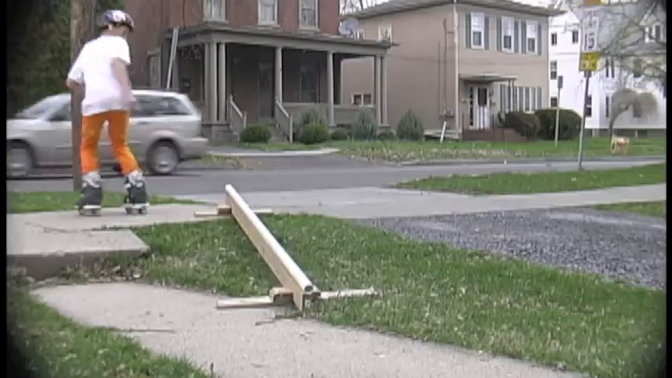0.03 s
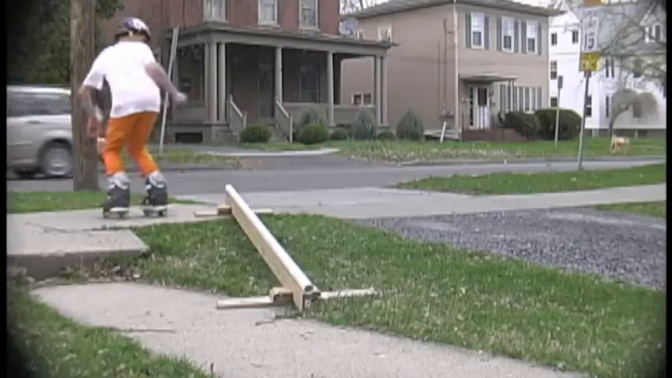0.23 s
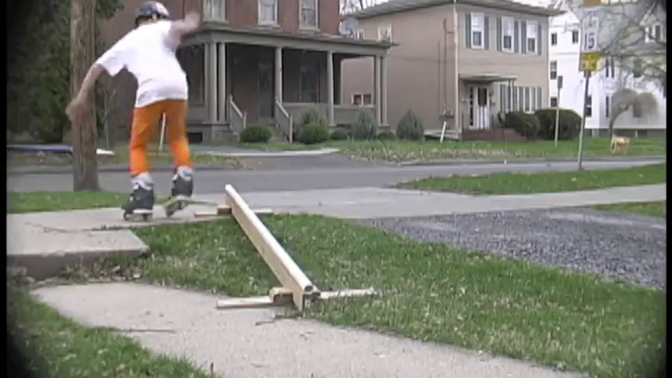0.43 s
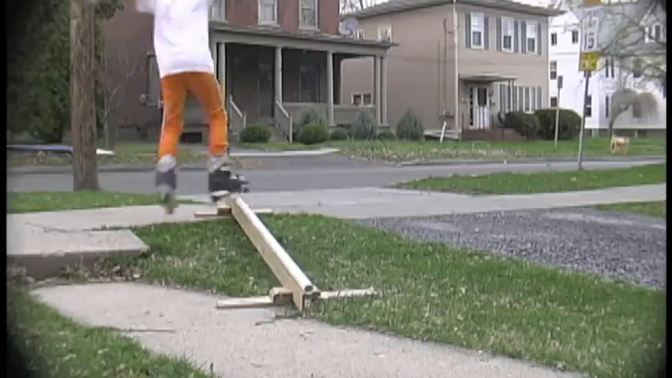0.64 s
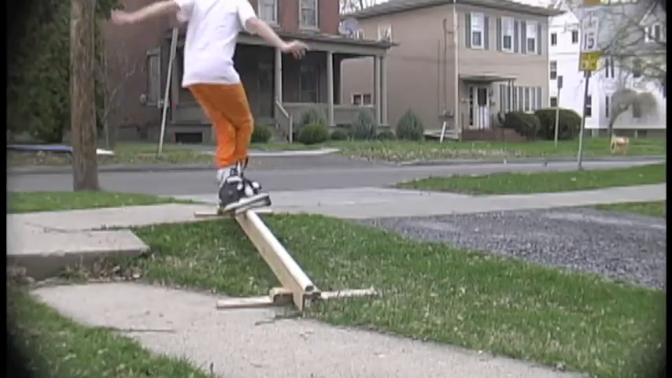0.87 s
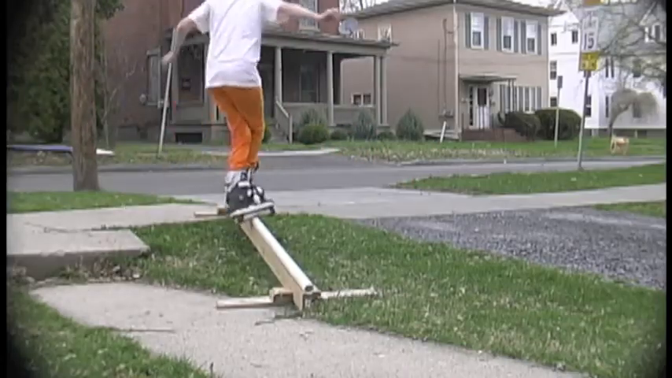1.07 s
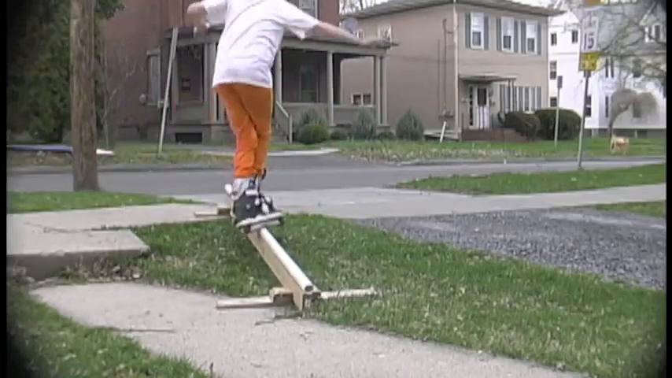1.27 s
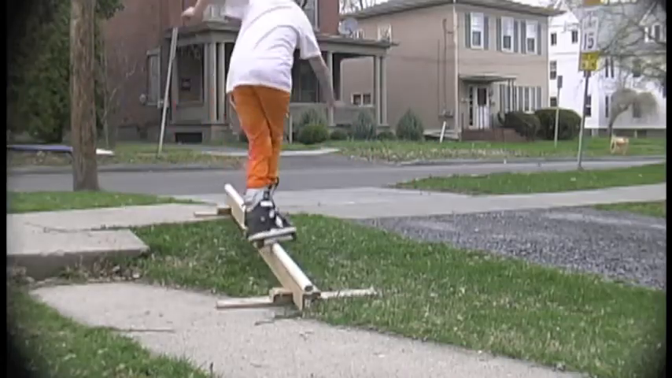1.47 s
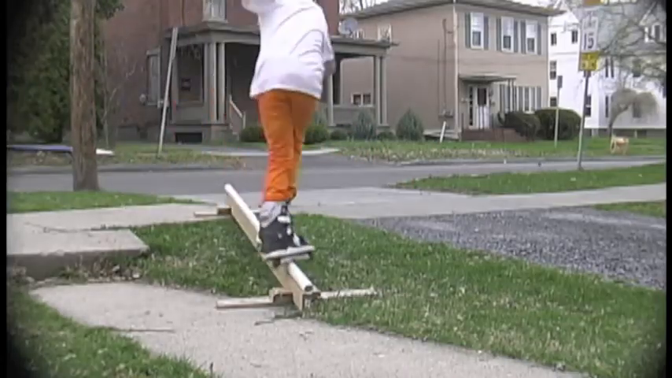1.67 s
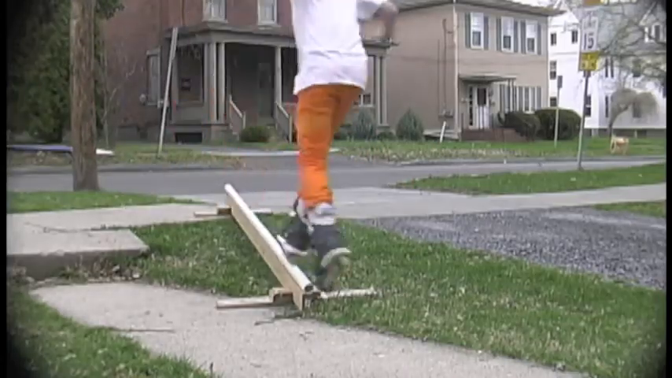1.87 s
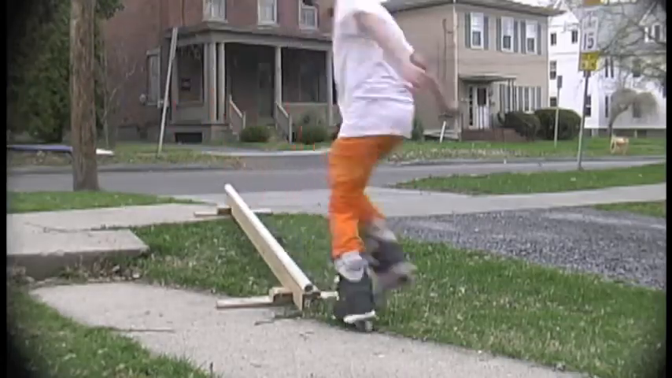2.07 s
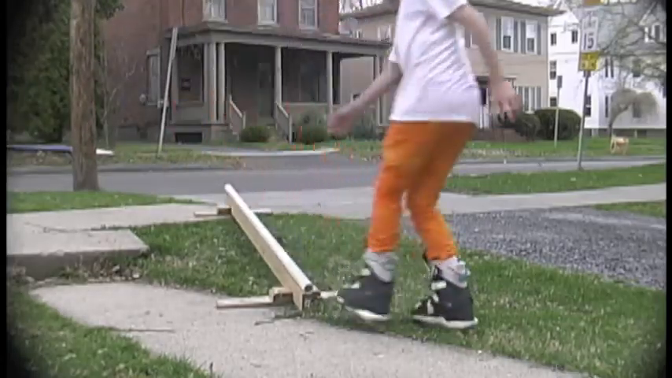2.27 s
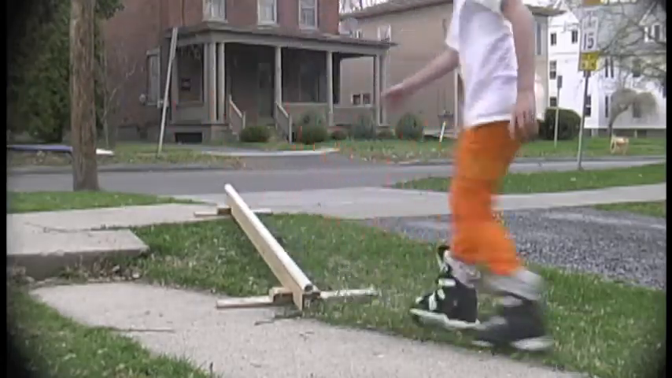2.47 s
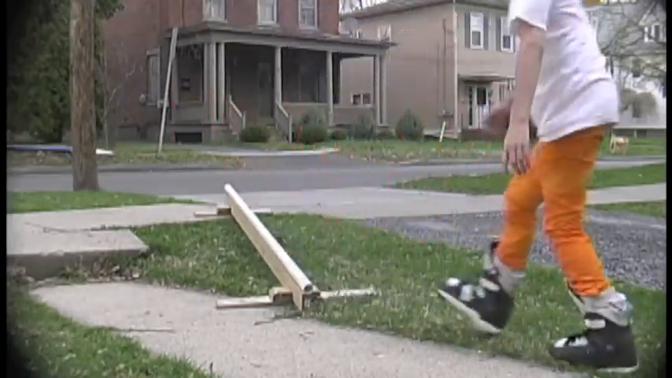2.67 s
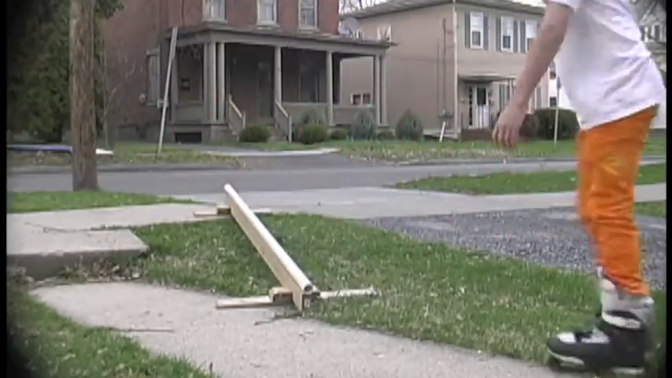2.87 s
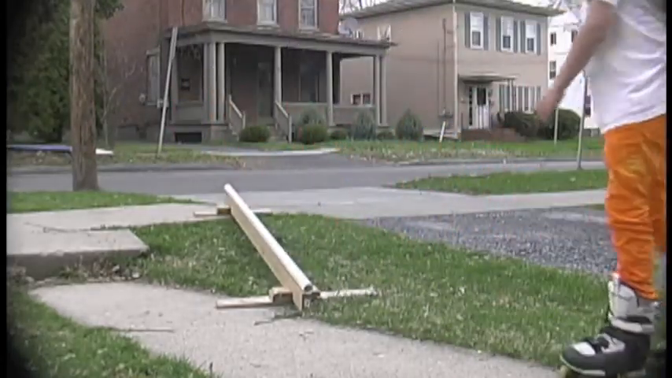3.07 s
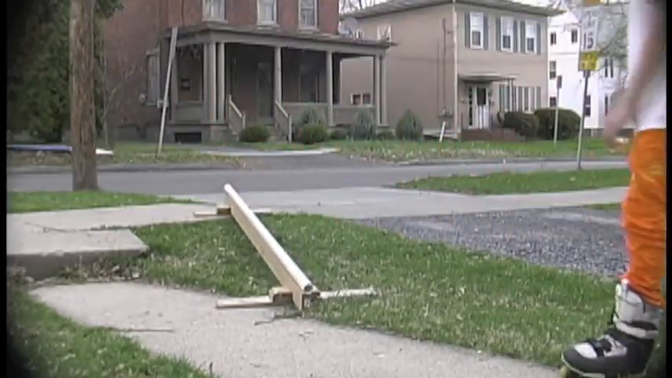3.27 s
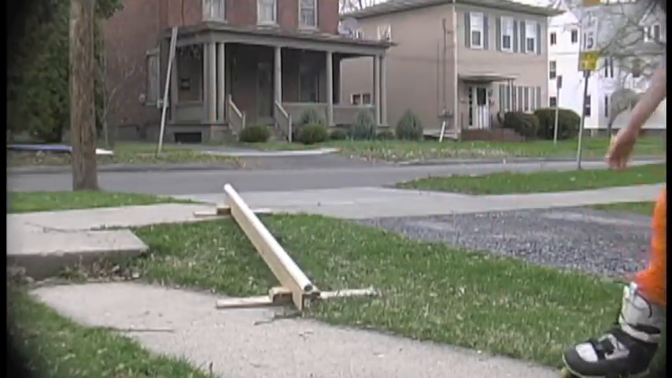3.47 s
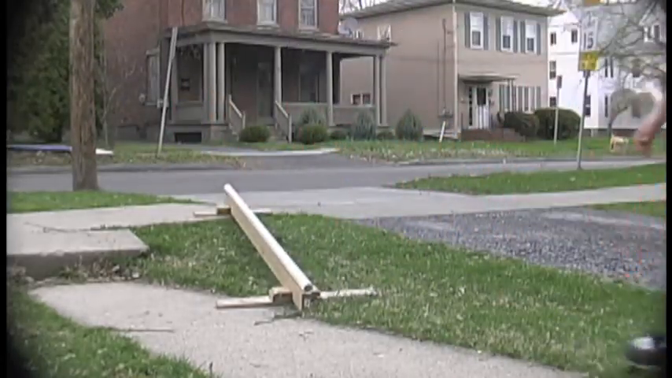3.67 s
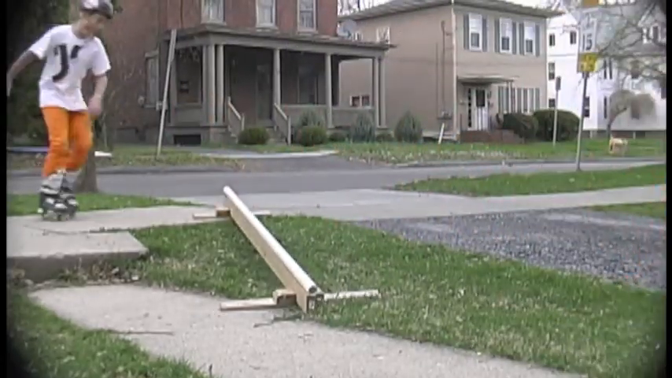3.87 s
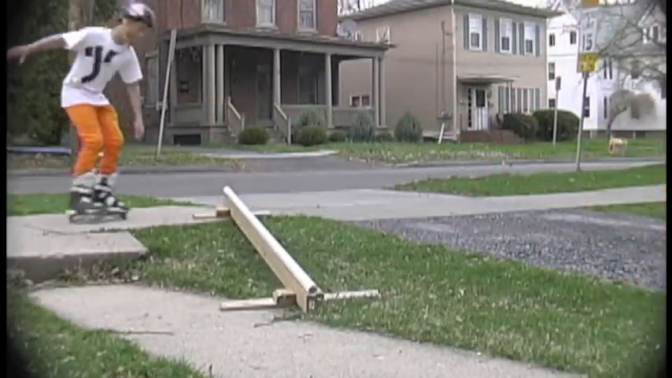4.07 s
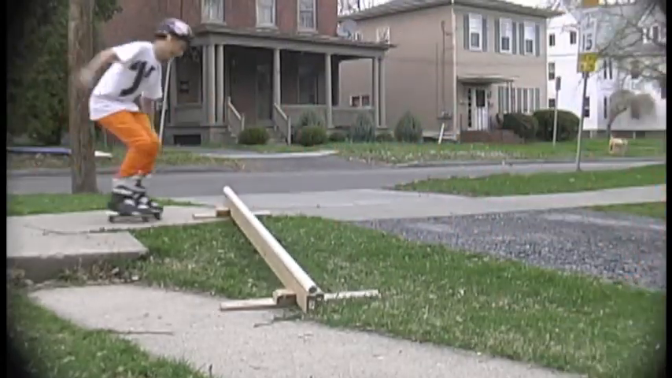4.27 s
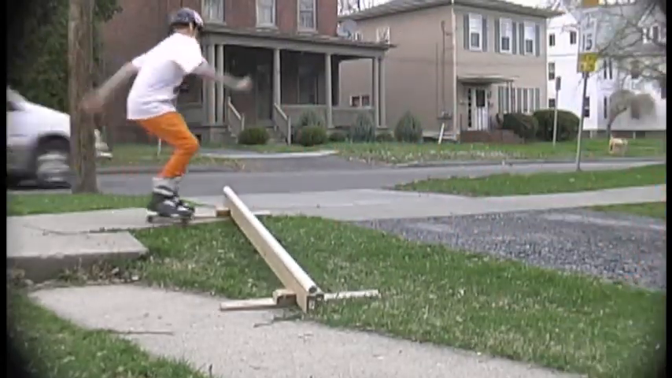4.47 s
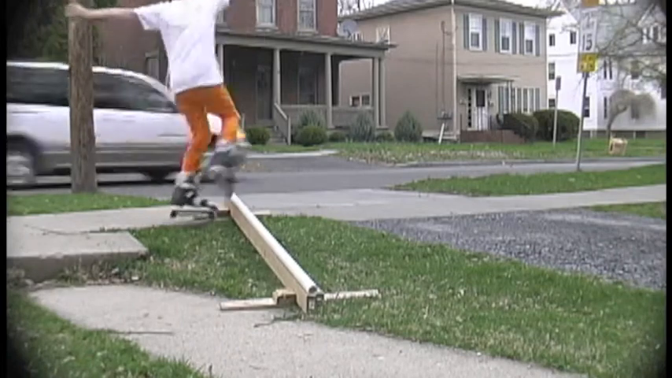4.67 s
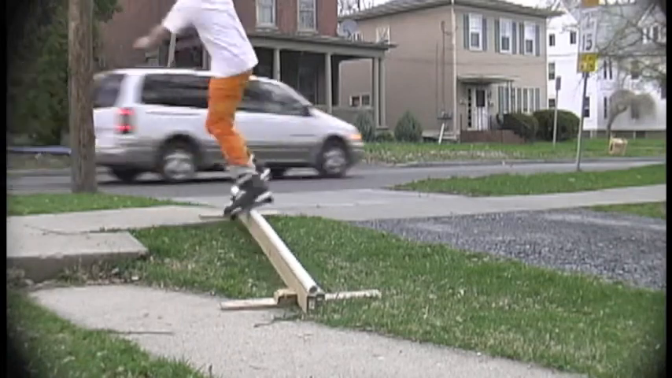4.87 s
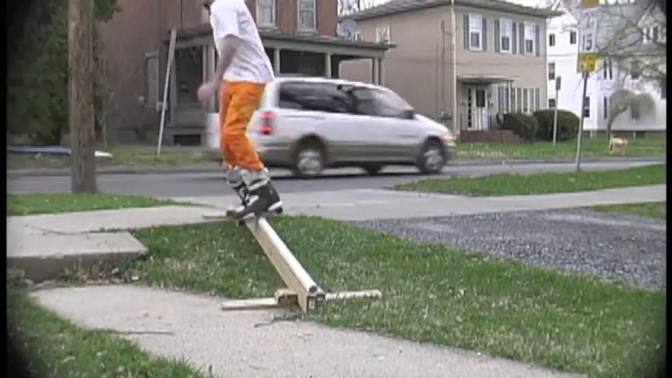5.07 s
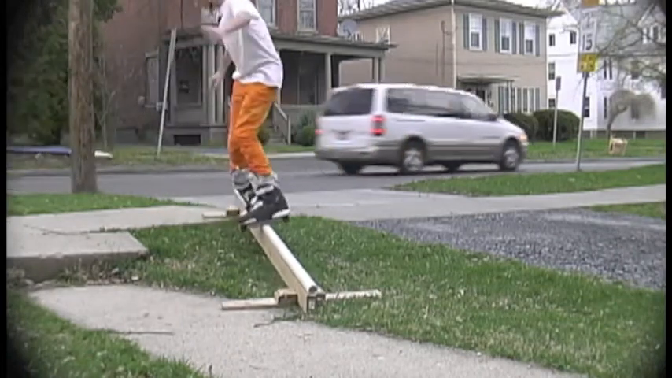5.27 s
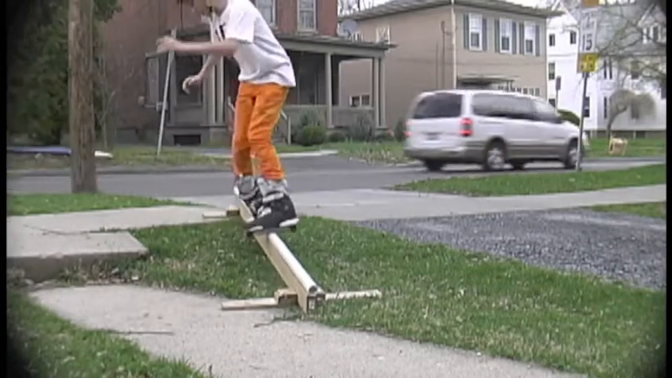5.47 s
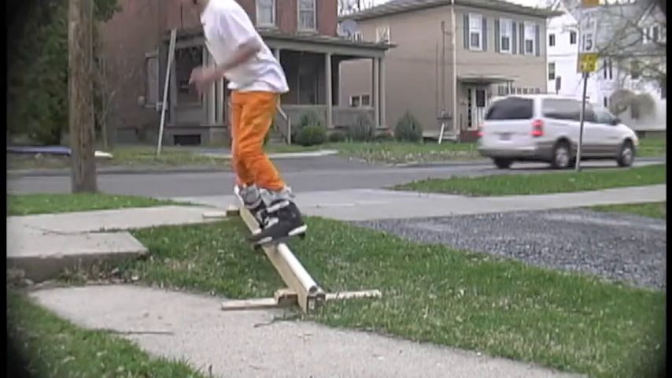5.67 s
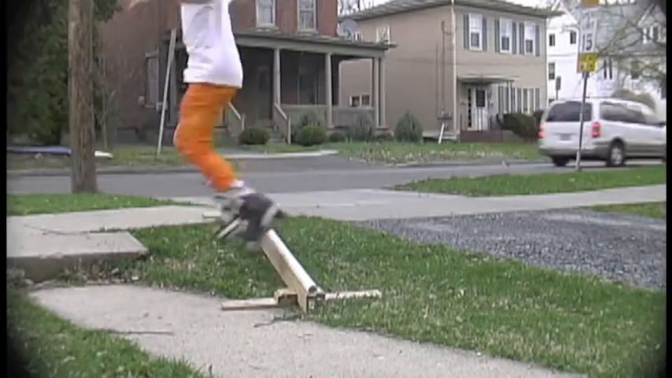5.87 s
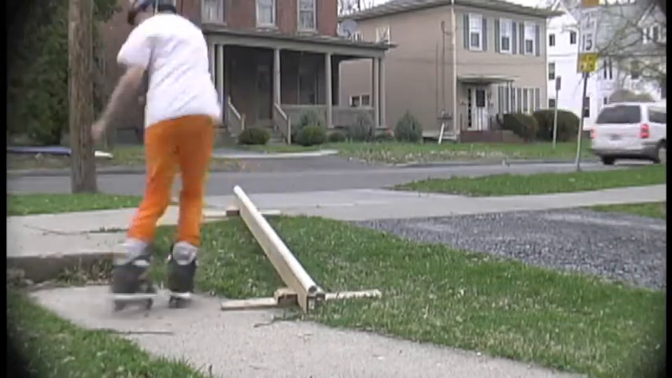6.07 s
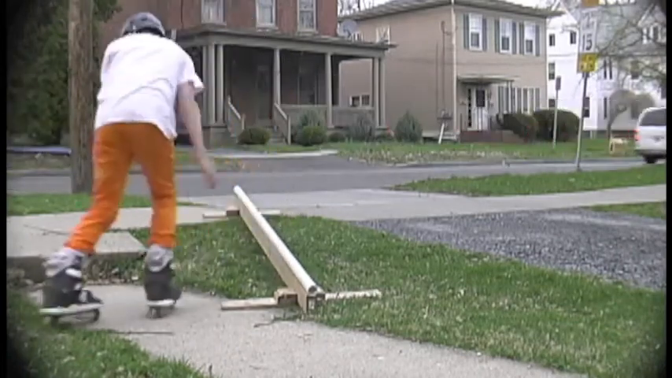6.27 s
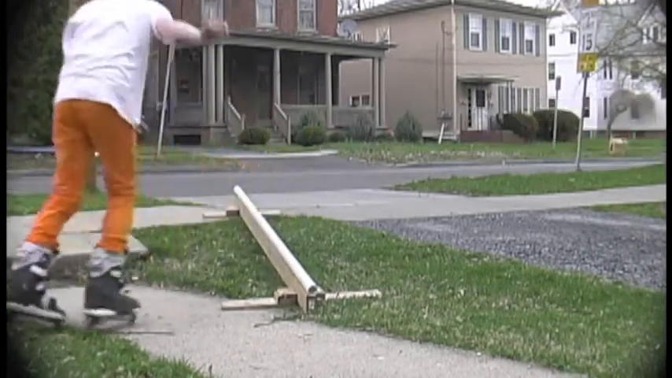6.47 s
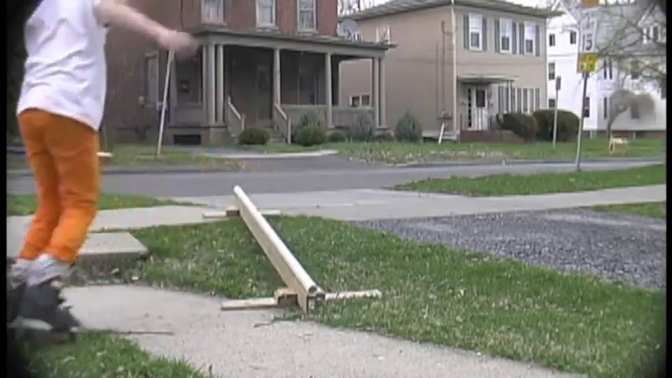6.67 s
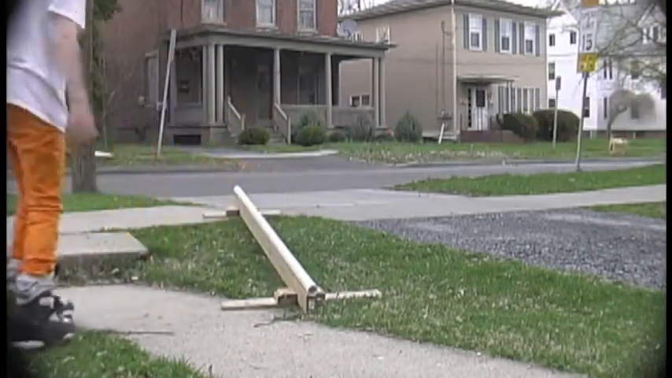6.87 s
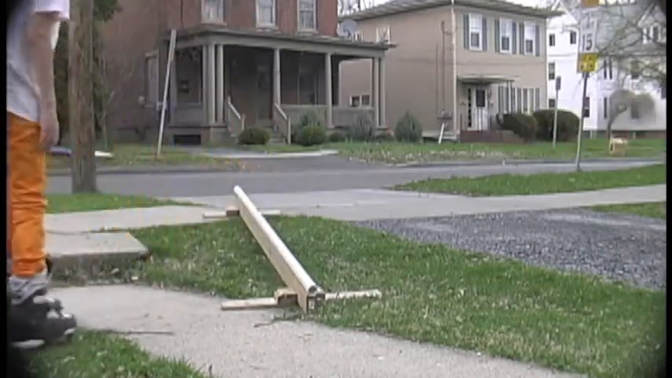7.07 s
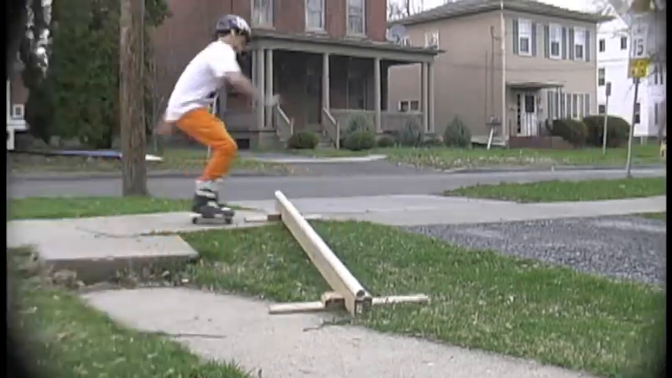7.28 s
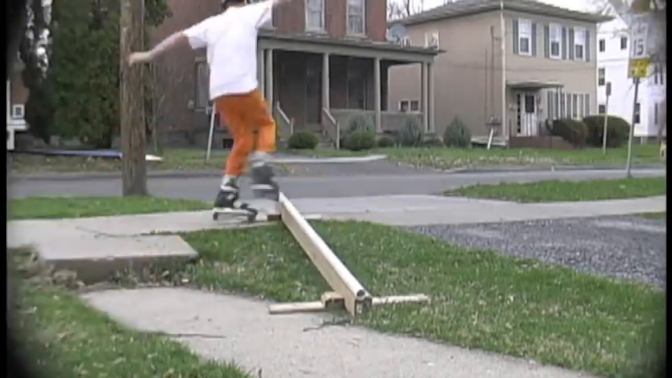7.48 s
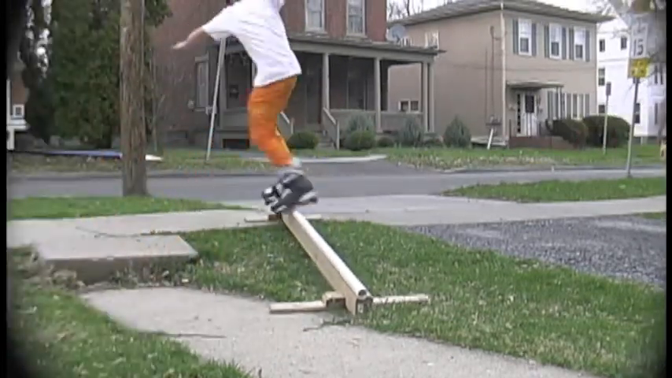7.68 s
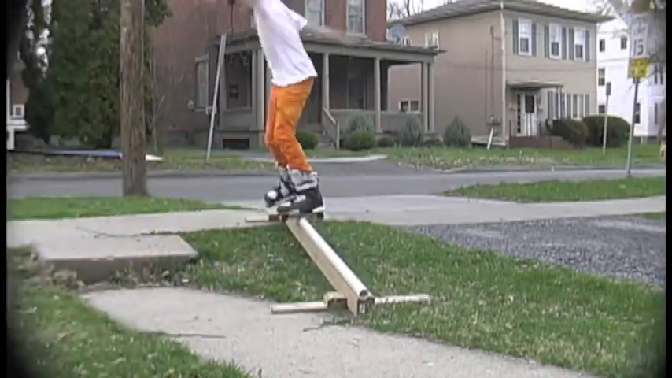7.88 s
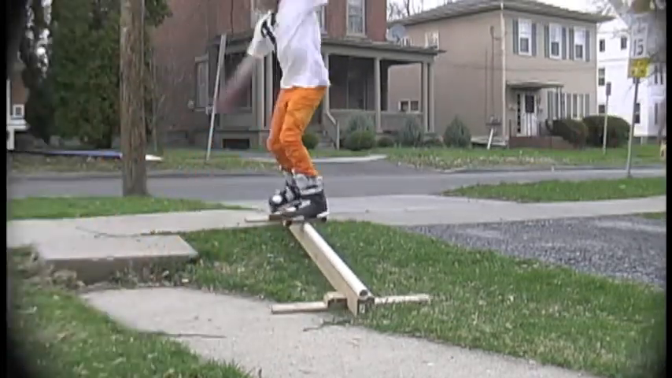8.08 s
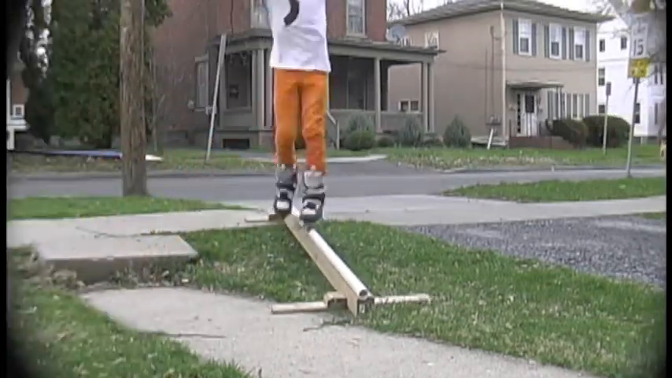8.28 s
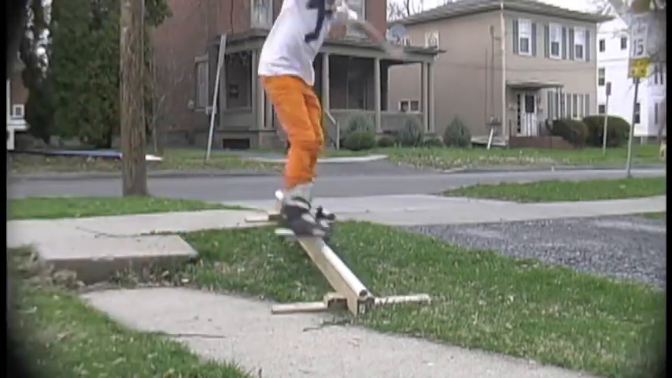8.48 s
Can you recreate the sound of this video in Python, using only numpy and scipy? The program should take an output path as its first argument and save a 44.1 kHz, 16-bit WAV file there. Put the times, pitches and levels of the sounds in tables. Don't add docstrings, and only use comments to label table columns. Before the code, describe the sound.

Three brief takes on a residential street, each dipping to silence between. Hard plastic skates knock a wooden rail with dry, rattling cracks, slide quietly, then thump onto pavement, followed by boot scrapes and small stones snapping. Low car engines and tyre wash lie underneath, loudest early in the middle take; faint birds twitter far off. The microphone is near the landing spot, with light low wind.

```python
import sys
import numpy as np
from scipy import signal
from scipy.fft import rfft, irfft
from scipy.io import wavfile
from scipy.ndimage import uniform_filter1d

SR = 44100
rng = np.random.default_rng(int(sys.argv[2]) if len(sys.argv) > 2 else 0)


def amplitude_ratio(level_db):
    exponent = np.asarray(level_db, float) / 20
    return 10 ** exponent


def file_out(sig):
    cols = np.atleast_2d(sig).T
    lim = np.clip(cols, -1, 1)
    pcm = np.round(lim * 32767).astype(np.int16)
    wavfile.write(sys.argv[1], SR, pcm)


N = 375732
TOP_HZ, DUST_HZ = 16500, 11500

CUTS_S = [.067, 3.768, 7.238]
TAKE = np.searchsorted(CUTS_S, np.arange(N) / SR)


def rms_one(x):
    return x / np.sqrt(np.mean(x ** 2) + 1e-20)


def in_time(rows):
    s, *columns = np.transpose(rows)
    return np.array([np.interp(np.arange(N) / SR, s, c) for c in columns])


def at_hz(points, hz):
    table_hz, db = np.array(points)[:, :2].T
    return np.interp(np.log(hz), np.log(table_hz), db)


def drift(rate):
    r = np.exp(-80 * np.pi * rate / SR)
    slow = signal.lfilter([1], [1, -2 * r, r * r], rng.standard_normal(N // 40 + 2002))[2000:]
    return np.interp(np.arange(N) / 40, np.arange(len(slow)), rms_one(slow))


def resonate(x, hz, width):
    r = np.exp(-np.pi * width / SR)
    poles = [1, -2 * r * np.cos(2 * np.pi * hz / SR), r * r]
    return signal.lfilter([(1 - r * r) / 2, 0, (r * r - 1) / 2], poles, x)


def sides(x, pan_db):
    return x * amplitude_ratio(np.array([pan_db / 2, -pan_db / 2]).reshape(2, -1))


def add(out, s, sound):
    i = round(s * SR)
    out[:, i:i + sound.shape[1]] += sound[:, :N - i]


def swells(rows, edge_s):
    lift_db = np.zeros(N)
    for s, length_s, db in rows:
        since = np.arange(N) / SR - s
        lift_db += db * np.clip(np.minimum(since, length_s - since) / edge_s + .5, 0, 1)
    return lift_db


# pitch in Hz, likeness as a share [0-1].
LIKENESS = [(60, 0.91), (150, 0.99), (380, 0.72), (950, 0.055), (2380, 0.48), (5980, 0.5), (15000, 0.68)]


def banded(spectra, patchy_db, grit):
    grain_gain = amplitude_ratio(4.5 * np.minimum(rng.exponential(1, N), 5))
    grains = (rng.random(N) < 1500 / SR) * grain_gain * rng.choice([-1, 1], N)
    white = rng.standard_normal((2, 2, N))
    white[:, 0] += grit * rms_one(grains)
    out, together, first = 0, drift(14.3), spectra[0]
    which = np.clip(TAKE - 1, 0, len(spectra) - 1)
    low_hz, high_hz = first[1][0], min(first[-2][0], TOP_HZ)
    edges = low_hz * 2 ** np.arange(-.4, np.log2(high_hz / low_hz) + .3, .4)
    for k, (low, high) in enumerate(zip(edges, edges[1:])):
        band = signal.butter(2, [low, high], "band", fs=SR, output="sos")
        mid, side = signal.sosfilt(band, white[k % 2])
        hz = np.sqrt(low * high)
        alike = np.clip(at_hz(LIKENESS, hz), 0, 1)
        colour = amplitude_ratio(np.array([at_hz(points, hz) for points in spectra]))[which]
        gain = colour * amplitude_ratio(patchy_db * (1.56 * together + drift(25.0)))
        out = out + gain * (np.sqrt(1 + alike) * mid + np.sqrt(1 - alike) * side * [[1], [-1]])
    return np.hstack([rms_one(out[:, which == k]) for k in range(len(spectra))])


def glide(out, s, length_s, start_hz, end_hz, db, steady, flutter_hz):
    t = np.arange(round(1.5 * length_s * SR)) / SR
    along = np.clip(t / length_s, 0, 1)
    r = np.exp(-2 * np.pi * flutter_hz / SR)
    chance = rng.standard_normal((2, len(t)))
    mid, side = [rms_one(signal.lfilter([1], [1, -2 * r, r * r], v)) for v in chance]
    note = np.sin(2 * np.pi * np.cumsum(start_hz + (end_hz - start_hz) * along) / SR)
    shape = np.abs(np.sin(np.pi * t / t[-1])) ** 0.28
    add(out, s, amplitude_ratio(db) * shape * note * (steady + mid + 0.12 * side * [[1], [-1]]))


# time in seconds, level in dB.
WIND = [(0, -41), (3.8, -45), (5.5, -46), (7.2, -44), (7.6, -38), (8.52, -35.5)]
# pitch in Hz, density in dB per Hz.
DEEP = [(12, -13), (20, -5.5), (38, -22), (75, -9), (90, -17), (120, -14.5), (200, -120)]


def wind():
    return amplitude_ratio(in_time(WIND)) * banded([DEEP], patchy_db=-2.5, grit=0.)


# time in seconds, tyre roar in dB, left over right in dB.
TRAFFIC = [(0, -45, -4), (.1, -45, 2.5), (1.23, -41.5, 2.5), (2.8, -44, 0.5), (3.7, -43.5, -2.5),
           (3.8, -38, 5), (5.26, -40.5, -2), (6.63, -46, -2), (7.1, -53, -5), (7.6, -53, 1.5),
           (8.52, -52.5, -1)]
DRONE_OVER_ROAR_DB = [0.1, 4.5, 0.78, 11.3]
# pitch in Hz, density in dB per Hz.
DRONE = [
    [(29, -40), (50, -10.5), (65, -7), (146, -8), (194, -14.5), (237, -10), (296, -16), (328, -19.5),
     (560, -33.5), (730, -68), (1230, -120)],
    [(29, -43), (50, 0.5), (80, -5), (113, 5), (182, 0.5), (225, -2), (284, -5), (435, -10), (486, -20),
     (560, -19), (730, -53), (1230, -120)],
    [(29, -32), (50, -25), (116, -4.5), (219, -17), (276, -15), (378, -29), (439, -35), (560, -30.5),
     (730, -60), (1230, -120)],
]
# pitch in Hz, density in dB per Hz.
ROAR = [
    [(260, -11), (450, -15.5), (662, -13), (1070, -3.5), (1180, -3.5), (1350, 16), (1610, -12.5),
     (3200, -17), (4160, -38), (7040, -120)],
    [(260, -35), (450, 0.5), (526, -21.5), (813, 2.5), (1040, -15.5), (1220, -1.5), (2360, -20),
     (3200, -13), (4160, -27.5), (7040, -120)],
    [(260, -37), (450, -29), (780, 8.5), (847, 1.5), (1820, -1), (2040, -3.5), (3200, -4), (4160, -8),
     (7040, -120)],
]


def traffic():
    roar_db, pan_db = in_time(TRAFFIC)
    van_turns_s, van_shadow_db = 4.08, -1
    leaving_db = np.clip(np.arange(N) / SR - van_turns_s, 0, 1) * van_shadow_db * (TAKE == 2)
    drone_db = roar_db + leaving_db + np.array(DRONE_OVER_ROAR_DB)[TAKE]
    drone = amplitude_ratio(drone_db) * banded(DRONE, patchy_db=0.87, grit=0.)
    roar = amplitude_ratio(roar_db) * banded(ROAR, patchy_db=.55, grit=0.027)
    return sides(drone, 1.0) + sides(roar, pan_db)


# start in seconds, length in seconds, pitch in Hz, level in dB.
TONES = [(.2, .35, 97, -43), (1.05, .35, 240, -46), (.7, .3, 88, -42), (2.9, .55, 120, -49),
         (3.8, .7, 232, -41), (3.81, .45, 130, -43), (3.85, .55, 88, -41), (5.3, .55, 111, -47),
         (6.2, .55, 68, -47), (7.3, .8, 113, -45)]


def cars():
    out = np.zeros((2, N))
    for s, length_s, hz, db in TONES:
        glide(out, s, length_s, hz, hz * (1 - 0.0497), db, steady=1.0, flutter_hz=10.2)
    return out


# time in seconds, load as level in dB.
IDLE = [(0.1, -41), (0.35, -31.5), (0.77, -49), (0.94, -36.5), (1.3, -35.5), (1.65, -38.5), (2.2, -35),
        (3.15, -42), (3.7, -45)]
# time in seconds, level in dB.
SECOND_IDLE = [
    (1.6, -48),
    (2.65, -40),
    (3.28, -40),
    (3.7, -48),
]


def idle():
    out, t = 0, np.arange(N) / SR
    for hz, rows in ((41, IDLE), (65, SECOND_IDLE)):
        sounding = np.clip((t - rows[0][0]) / 0.056, 0, 1) * (t < CUTS_S[1])
        level = np.sqrt(2) * amplitude_ratio(in_time(rows)[0] + 1.4 * drift(0.66))
        out = out + sounding * level * np.sin(2 * np.pi * hz * t)
    return sides(out, 0.63)


# start in seconds, length in seconds, centre in Hz, level in dB.
TWITTERS = [(0.266, .07, 4550, -44.5), (0.424, 0.09, 5140, -49), (1.957, .04, 3450, -39.5),
            (2.75, 0.065, 4370, -49), (3.34, 0.09, 4520, -50), (3.391, 0.05, 3860, -48),
            (3.45, 0.097, 4820, -48), (3.881, 0.16, 4400, -49), (7.2, 0.056, 4410, -47),
            (3.985, .04, 4540, -43), (8.126, 0.097, 4600, -59)]
# start in seconds, length in seconds, start in Hz, end in Hz, level in dB.
CHIRPS = [(0.844, 0.031, 4900, 3100, -49), (0.889, 0.02, 3150, 3500, -41), (2.754, 0.04, 4500, 4000, -50),
          (2.805, 0.028, 3120, 3260, -46), (0.24, 0.015, 4860, 5030, -46), (1.34, 0.025, 4300, 3300, -51),
          (3.888, .06, 4380, 4300, -55), (1.15, .015, 2950, 3300, -55), (1.318, 0.026, 4700, 4930, -50),
          (1.4, .012, 4350, 4460, -50), (1.43, 0.025, 4770, 5100, -46), (4.602, 0.017, 4960, 4940, -37),
          (6.502, 0.022, 5000, 4900, -46), (8.192, 0.029, 3520, 3500, -56), (3.33, .06, 4840, 4850, -48),
          (3.356, 0.022, 4300, 3950, -47), (5.794, .012, 4500, 4430, -53), (5.857, 0.05, 4330, 4060, -51),
          (5.917, 0.029, 3600, 3290, -52), (5.939, 0.022, 3390, 2810, -48),
          (7.281, 0.068, 3500, 3450, -51.5), (7.343, .035, 3400, 3100, -53),
          (7.475, 0.014, 5250, 5050, -46), (7.6, .025, 4500, 4430, -55), (8.14, 0.052, 4500, 4400, -58)]


def birds():
    out = np.zeros((2, N))
    note_s, gap_s, spread, note_fall = .022, .022, .045, .03
    for s, length_s, hz, db in TWITTERS:
        for k, (late, pitch, fall, loud) in enumerate(rng.standard_normal((8, 4))):
            if k * gap_s < length_s:
                start_hz = hz * (1 + note_fall / 2 + spread * pitch)
                end_hz = start_hz * (1 - note_fall * (1 + fall / 2))
                start_s = s + gap_s * (k + 0.53 * late)
                glide(out, start_s, note_s, start_hz, end_hz, db + loud, steady=.2, flutter_hz=400)
    for chirp in CHIRPS:
        glide(out, *chirp, steady=1.05, flutter_hz=200)
    return out


# lag in seconds, level in dB.
ECHOES = [(.009, -20), (.021, -24), (.047, -28), (.083, -33)]


def street(x):
    t = np.arange(round(.5 * SR)) / SR
    t60_s, tail_db, cut_hz = .4, -21, 6000
    shape = amplitude_ratio(tail_db - 60 * t / t60_s) * np.minimum(t / .01, 1) * .03
    for lag_s, db in ECHOES:
        shape = shape + .12 * amplitude_ratio(db) * np.exp(-((t - lag_s) / .0015) ** 2)
    tail = signal.lfilter(*signal.butter(1, cut_hz, fs=SR), shape * rng.standard_normal((2, len(t))))
    return signal.fftconvolve(x, tail, axes=1)[:, :N]


# start in seconds, peak in dB, pitch in Hz, t60 in seconds.
THUMPS = [(0.907, -21.5, 200, 0.048), (2.089, -8.5, 109, 0.068), (2.986, -16.5, 141, 0.037),
          (4.899, -27.5, 62, 0.45), (4.945, -16.5, 103, 0.087), (5.026, -21.5, 89, 0.12),
          (6.0917, -13, 167, 0.037), (6.108, -6, 190, 0.023), (6.129, -13, 89, 0.12),
          (7.742, -21, 203, 0.084), (7.737, -19.5, 121, 0.12), (8.49, -25, 61.4, 0.11)]
AFTER_RING = [(82.8, -21, 0.53), (167.4, -24, 0.41)]


def thumps():
    out, t = np.zeros((2, N)), np.arange(round(.3 * SR)) / SR
    for s, peak_db, hz, t60 in THUMPS:
        turns = hz * (t + 0.0013 * (1 - np.exp(-t / 0.0096)))
        shape = amplitude_ratio(peak_db - 60 * t / t60) * np.minimum(t / 0.001, 1)
        add(out, s, sides(shape * np.sin(2 * np.pi * turns), 0.8))
    hum = sum(amplitude_ratio(db - 60 * t / t60) * -np.cos(2 * np.pi * hz * t) for hz, db, t60 in AFTER_RING)
    add(out, 0, sides(hum, 0))
    return out


# start in seconds, length in seconds, start in
# Hz, end in Hz, level in dB.
ROUGH_GLIDES = [
    (2.802, 0.14, 1700, 2230, -39.5),
    (6.603, 0.43, 1250, 1484, -50),
    (7.681, 0.021, 4500, 5070, -44),
    (7.797, 0.081, 945, 864, -45),
]


def rough_glides():
    out = np.zeros((2, N))
    for scrub in ROUGH_GLIDES:
        glide(out, *scrub, steady=0, flutter_hz=450)
    return out


# pitch in Hz, density in dB per Hz.
CRUNCH = [(410, -9), (700, -13.5), (1200, 1.5), (1970, -2), (2700, -2.5), (3280, -5), (5470, -3.5),
          (8990, -8.5), (16000, -30)]


def crunch(size, lumps_db):
    hz = np.maximum(np.arange(size // 2 + 1) * SR / size, 1)
    mid, side = irfft(rfft(rng.standard_normal((2, size))) * amplitude_ratio(at_hz(CRUNCH, hz)), size)
    chance = rng.standard_normal((2, size))
    lumps = uniform_filter1d(chance[0], size=64) * 8 + uniform_filter1d(chance[1], size=625) * 10
    return rms_one(amplitude_ratio(lumps_db * lumps) * (mid + 0.46 * side * [[1], [-1]]))


# time in seconds, pressure as rasp in dB, fineness of the grit in dB.
SKATES = [(0, -38.5, -12), (.42, -47, -3), (.62, -49.5, -8), (1.1, -50, -8), (1.81, -44.5, -12),
          (2.59, -45, -16.5), (3.11, -45.5, -14), (3.55, -43.5, -13), (4.0, -47.5, -8),
          (5.14, -38.5, -12.5), (5.55, -47.5, -8.5), (6.1, -50.5, -13.5), (6.8, -51, -8),
          (7.08, -54.5, -19), (7.4, -49, 0), (7.72, -48, -12), (7.95, -53, -14), (8.52, -65, 4)]
# start in seconds, length in seconds, added dB.
ROLLS = [
    (2.092, 0.29, 5.5),
    (2.7, 0.24, 3.5),
    (6.224, 0.39, 8.5),
]
# start in seconds, length in seconds, added dB.
HISSES = [(2.518, 0.178, 14), (2.745, 0.04, 3), (3.618, 0.037, 9), (4.56, 0.035, 11), (5.797, 0.057, 9),
          (5.148, 0.072, -3), (8.163, .08, 5)]
# time in seconds, finest dust in dB.
NEARNESS = [(0, 5.5), (1.4, -2.5), (2.1, 14.5), (2.6, 14), (3.0, 16), (3.7, 7.5), (4.6, -1), (5.2, -14),
            (5.8, -2.5), (6.3, 10.5), (7.0, 4), (8.52, 1)]
# pitch in Hz, density in dB per Hz.
RASP = [(1060, -20), (1800, 18.5), (2270, -0.5), (2800, 6), (3220, 7), (4230, 3.5), (4890, 5.5), (5750, -9),
        (8000, -1.5), (10400, -29), (17600, -120)]
# pitch in Hz, density in dB per Hz.
SIZZLE = [(3530, -42), (6000, 5.5), (8100, 8), (10200, -16), (11400, -11.5), (13700, -1.5), (15900, -15),
          (16300, -34.5), (16500, -67)]
# start in seconds, length in seconds, level in dB.
DRAGS = [(2.507, 0.16, -36), (2.559, 0.048, -33.5), (2.852, 0.15, -41.5), (3.625, 0.051, -59),
         (5.799, 0.054, -47), (6.309, 0.088, -39.5), (6.614, 0.12, -41), (7.727, 0.015, -27),
         (8.183, 0.065, -48)]


def scrape():
    rasp_db, fine_db = in_time(SKATES)
    rasp_db = rasp_db + swells(ROLLS, edge_s=0.081)
    fine_db = fine_db + swells(HISSES, edge_s=.02)
    rasp = banded([RASP], patchy_db=1.1, grit=.6)
    sizzle = banded([SIZZLE], patchy_db=1.1, grit=.45)
    dust = signal.sosfilt(signal.butter(4, DUST_HZ, "high", fs=SR, output="sos"), sizzle)
    coarse = signal.sosfilt(signal.butter(4, DUST_HZ, fs=SR, output="sos"), sizzle)
    sizzle = coarse + amplitude_ratio(in_time(NEARNESS)) * dust
    out = amplitude_ratio(rasp_db) * (rasp + amplitude_ratio(fine_db) * sizzle)
    t = np.arange(round(.3 * SR)) / SR
    for s, length_s, db in DRAGS:
        stroke = np.minimum(t / 0.00055, 1) * amplitude_ratio(-600 * np.maximum(t - length_s, 0))
        add(out, s, sides(amplitude_ratio(db) * stroke * crunch(len(t), lumps_db=3.0), -1.5))
    return out


# pitch in Hz, width in Hz, level in dB.
FRAME = [(1700, 700, -5), (2400, 900, -1), (3400, 900, 2), (4400, 1000, -2), (5500, 1100, -1),
         (6800, 1400, -3), (8600, 2000, -4), (12500, 5000, -12), (15200, 2500, -15)]


def crack(hz, t60, focus_db, size, air_db=0):
    t = np.arange(size) / SR
    shape = np.minimum(t / 0.00059, 1) * (amplitude_ratio(-60 * t / t60) + 0.39 * amplitude_ratio(-14 * t / t60))
    mid, side = rng.standard_normal((2, len(t))) * shape
    mid[round(.001 * SR)] += 3.5
    burst = mid + 0.32 * side * [[1], [-1]]
    out = 0
    for k, (f, width, db) in enumerate(FRAME):
        out = out + (-1) ** k * amplitude_ratio(db + air_db * (f > DUST_HZ)) * resonate(burst, f, width)
    out = signal.lfilter(*signal.butter(1, hz / 2, "high", fs=SR), out)
    out = out + amplitude_ratio(focus_db) * resonate(out, hz, 1500)
    return out / np.max(np.abs(out.mean(axis=0)))


# start in seconds, end in seconds.
ON_GROUND = [
    (.1, .7),
    (2.2, 3.6),
    (6.22, 6.75),
]
# start in seconds, peak in dB,
# centre in Hz.
GRIT = [(3.42, -38, 13000), (0.385, -31, 4700), (0.473, -30, 5100), (.62, -32, 4800), (2.511, -22, 3000),
        (2.529, -21, 2900), (2.577, -25, 1900), (2.592, -25, 1900), (2.866, -33, 1800), (2.893, -30, 4000),
        (2.911, -25, 2000), (5.192, -38, 9000), (3.705, -39, 8000), (6.1072, 2, 2900), (6.128, -15, 3100),
        (6.094, -19, 7000), (7.734, -32, 1700), (7.75, -22, 4500)]


def pebbles():
    out, pressure_db = np.zeros((2, N)), in_time(SKATES)[0]
    per_s, pebble_db = 20, -1
    for when, pitch, size in rng.random((int(per_s * N / SR), 3)):
        s = when * N / SR
        if any(start < s < end for start, end in ON_GROUND):
            click = crack(4000 * (1 + pitch), t60=.008, focus_db=8., size=882)
            add(out, s, amplitude_ratio(pressure_db[int(when * N)] + pebble_db - 10 * size) * click)
    for s, peak_db, hz in GRIT:
        add(out, s, amplitude_ratio(peak_db) * crack(hz, t60=0.0025, focus_db=11.0, size=1764))
    return out


# start in seconds, peak in dB, centre in Hz.
TICKS = [(0.1408, -22, 3120), (0.517, -26, 3150), (0.566, -26.5, 4930), (0.633, -23.5, 5050),
         (1.0196, -27, 7890), (1.0754, -27.5, 4330), (1.4638, -23.5, 7940), (1.464, -26, 4200),
         (1.817, -24.5, 4470), (1.8891, -15, 4340), (1.94, -16.5, 5200), (2.153, -19, 7400),
         (2.1535, -16, 3700), (2.19, -17, 3500), (2.1965, -32, 7800), (2.206, -19, 1750),
         (2.207, -29, 4500), (2.216, -25, 1800), (.939, -17, 2800), (.99, -28, 3200), (2.9, -28, 4200),
         (2.93, -34, 2300), (3.188, -34, 8200), (3.468, -27, 1900), (7.283, -30.5, 5200),
         (7.367, -28, 5200), (7.392, -40, 5600), (7.521, -30, 3300), (7.538, -26, 2700), (7.595, -33, 5200),
         (2.568, -21, 3670), (2.593, -27, 5530), (5.888, -32.5, 6500), (5.9666, -25.5, 6600),
         (6.7186, -26.5, 3260), (6.8, -28, 4440), (6.8802, -31, 6100), (7.08, -21.5, 7300),
         (7.445, -23, 4950), (7.5827, -28, 5230), (7.781, -21, 3600), (8.2807, -25, 4970),
         (8.409, -28.5, 7600),
         (1.596, -41, 5600), (1.698, -32, 6000), (1.936, -24, 9000), (2.9705, -28, 6500),
          (2.99, -17, 9000), (3.899, -33, 4170), (3.993, -30, 4450), (4.3013, -28, 4640),
          (4.3781, -31, 3020), (4.4674, -34, 4450), (4.5163, -24, 3190), (4.637, -31, 9000),
          (4.648, -33, 9000), (4.7114, -23.5, 3900), (4.749, -34, 3030), (4.8974, -29, 2500),
          (6.31, -27, 3620), (6.42, -27, 6000), (6.4443, -25, 3090), (6.468, -28, 8500),
          (6.5022, -37, 4500), (6.5226, -39, 4950), (6.5451, -36, 4480), (6.583, -29, 7000),
          (6.6, -31, 2110), (6.6174, -27, 3560), (6.6474, -29, 8090), (6.661, -28, 8500), (6.73, -35, 5000),
          (6.93, -54, 11000), (8.0896, -50, 9000), (8.22, -42, 9500), (8.3246, -41, 9000),
          (8.348, -33, 4690)]


def ticks():
    out = np.zeros((2, N))
    for s, peak_db, hz in TICKS:
        add(out, s, amplitude_ratio(peak_db - 2.5) * crack(hz, t60=0.0083, focus_db=10.5, size=1764))
    return out


JANGLE_S = [2.087, .909, 7.737, 7.745, 4.9, 2.984, 4.557, 8.49, 6.108, 6.129, .909, .768]
# centre in Hz, width in Hz, level in dB, t60 in seconds.
JANGLES = [(3700, 880, -23, .2), (2808, 900, -36, 0.11), (2300, 1300, -30, 0.31), (5600, 900, -32, .08),
           (2900, 1300, -20, 0.04), (1850, 850, -19, 0.059), (5200, 870, -33, .15), (1080, 380, -29, 0.05),
           (3100, 1500, -20.5, 0.064), (3500, 1700, -16, 0.061), (590, 120, -30, 0.11),
           (564, 240, -28.5, 0.13)]


def jangles():
    out, t = np.zeros((2, N)), np.arange(round(.15 * SR)) / SR
    for s, (hz, width, db, t60) in zip(JANGLE_S, JANGLES):
        ring = resonate(resonate(crunch(len(t), lumps_db=2.5), hz, width), hz, 2 * width)
        add(out, s, amplitude_ratio(db - 60 * t / t60) * np.minimum(t / 0.0027, 1) * rms_one(ring))
    return out


def lead(hz):
    return 0.5 * np.exp(-np.log2(hz / 700) ** 2) * np.array([[1], [-1]])


# pitch in Hz, level in dB, t60 in seconds.
WOOD = [(322, 4.5, 0.019), (428, -18.5, 0.13), (568, -11, 0.05), (711, -6, 0.058), (920, 7.5, 0.015),
        (1206, 13.5, 0.0062), (1700, -4.5, 0.035), (1987, 7, 0.012)]


def wood_knock(t):
    phases, spread_db = rng.uniform(0, 2 * np.pi, len(WOOD)), rng.normal(0, 2.9, len(WOOD))
    knock = 0
    for (hz, db, t60), phase, change_db in zip(WOOD, phases, spread_db):
        mode = np.sin(2 * np.pi * hz * t + phase + lead(hz))
        knock = knock + amplitude_ratio(db + change_db - 60 * t / t60) * mode
    return knock * np.minimum(t / 0.0017, 1) / np.max(np.abs(knock))


def clack(out, s, peak_db, hz, wood_db, rattle_db, air_db):
    t = np.arange(round(.25 * SR)) / SR
    knock = wood_knock(t)
    loose = crunch(len(t), lumps_db=2.6)
    rattle_shape = np.minimum(t / 0.00013, 1) * amplitude_ratio(-2.5 - 60 * t / 0.23)
    rattle = (loose + 0.35 * resonate(loose, hz, 700)) * rattle_shape
    add(out, s, amplitude_ratio(peak_db) * (amplitude_ratio(wood_db) * knock + amplitude_ratio(rattle_db) * rattle))
    add(out, s, amplitude_ratio(peak_db) * crack(hz, t60=0.0059, focus_db=8.5, size=2205, air_db=air_db))


# start in seconds, peak in dB, crack centre in Hz, rattle in dB.
GROUND_HITS = [(0.0777, -1, 3400, -26), (2.024, -14.5, 2780, -19), (2.0853, 8, 3750, -28.5),
               (2.088, -22, 3900, -35), (2.161, -14, 7600, -30), (2.1947, -13.5, 3740, -15),
               (2.9843, -11, 5600, -19), (2.9927, -8.5, 8600, -31), (4.058, -13.5, 3030, -16),
               (4.0735, -14, 7360, -25), (4.073, -16.5, 4400, -20), (4.2065, -17, 3100, -16),
               (4.5545, -9, 4950, -19), (6.0897, 0.5, 5050, -21), (6.107, -2.5, 5050, -19.5),
               (6.127, 0, 4950, -23), (6.2021, -10, 7300, -16.5)]


def ground_hits():
    out = np.zeros((2, N))
    for s, peak_db, hz, rattle_db in GROUND_HITS:
        clack(out, s, peak_db, hz, -7.5, rattle_db, air_db=-2)
    return out


# start in seconds, peak in dB, crack centre in Hz, wood knock in dB, rattle in dB.
RAIL_HITS = [(0.7458, -22, 2220, 9, -9), (0.7657, -10, 3180, -1.5, -20), (0.9069, -5.5, 5230, -15, -16),
             (.9095, -15, 3300, -3, -25), (.917, -20, 2200, 4, -27), (0.9665, -17, 2760, -4, -23),
             (4.8976, 0.5, 6160, -5, -22.5), (4.9282, -23.5, 2330, 15, 0), (5.0135, -14.5, 5470, -3, -10),
             (5.0194, -4, 4000, 0.5, -36), (5.0418, -10.5, 2500, -5, -19), (5.0432, -13.5, 7500, -18, -30),
             (5.1156, -17.5, 3360, 1, -27), (7.66, -19, 4460, -0.5, -27), (7.7347, 2, 5260, -4.5, -25.5),
             (7.7375, -11.5, 2950, 0, -19), (7.7547, -15, 5600, 10, -17), (8.369, -16, 4200, -4, -22),
             (8.488, -10, 3600, -4.5, -24)]


def rail_hits():
    out = np.zeros((2, N))
    for s, peak_db, hz, wood_db, rattle_db in RAIL_HITS:
        clack(out, s, peak_db, hz, wood_db, rattle_db, air_db=1.2 * peak_db)
    return out


def scene():
    background = wind() + traffic() + cars() + idle() + birds()
    hits = ticks() + jangles() + ground_hits() + rail_hits()
    return background + thumps() + rough_glides() + scrape() + pebbles() + hits + street(hits)


FADE_OUT_S = [0.097, 0.13, 0.079]
FADE_IN_S = [0.09, 0.11, 0.11]


def fades():
    t = np.arange(N) / SR
    gain = amplitude_ratio(-1.49 * t * (TAKE == 1))
    for s, out_s, in_s in zip(CUTS_S, FADE_OUT_S, FADE_IN_S):
        gain = gain * np.minimum(np.maximum((s - t) / out_s, (t - s) / in_s), 1)
    return gain


def roll_off(x):
    return signal.sosfilt(signal.butter(12, 16700, fs=SR, output="sos"), x)


def record(dry):
    rounded = dry / (1 + (dry / .8) ** 4) ** .25
    cut = signal.sosfilt(signal.cheby2(10, 60, TOP_HZ + 800, fs=SR, output="sos"), rounded)
    return roll_off(fades() * cut)


dry = scene()
out = record(dry)
file_out(out)
```